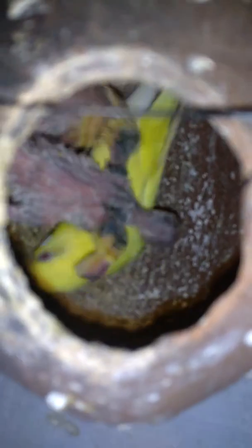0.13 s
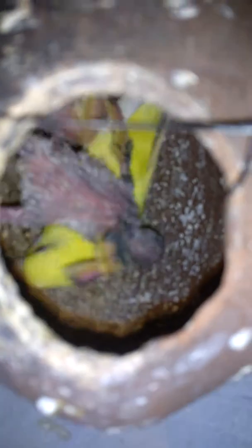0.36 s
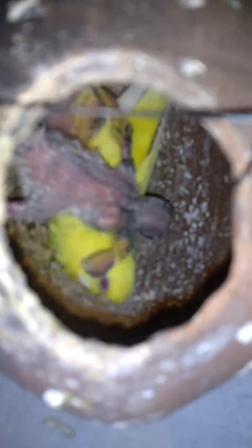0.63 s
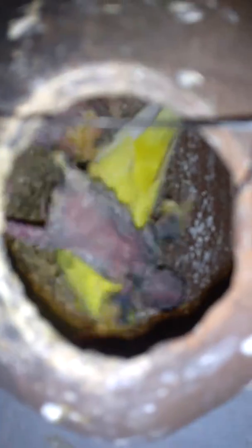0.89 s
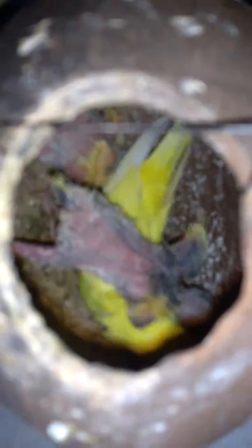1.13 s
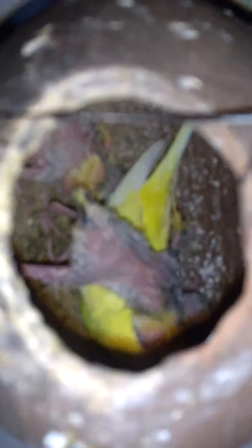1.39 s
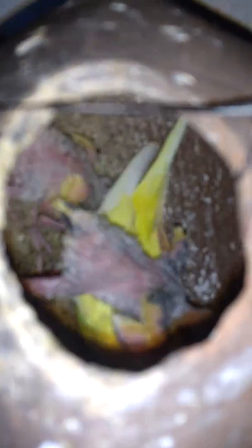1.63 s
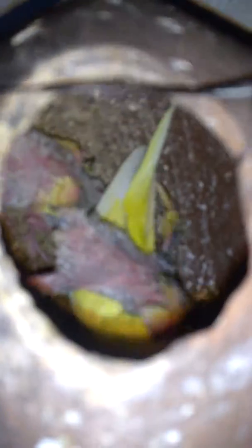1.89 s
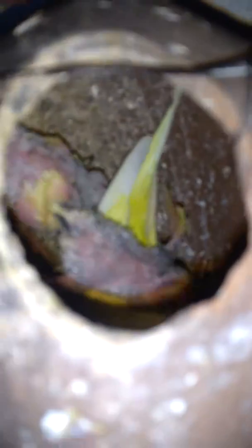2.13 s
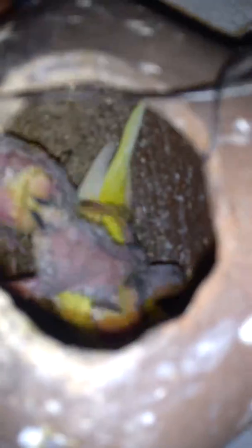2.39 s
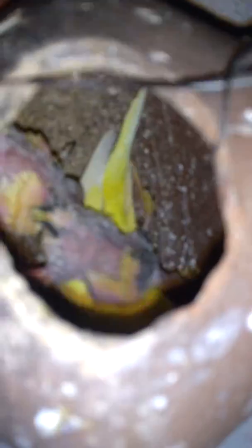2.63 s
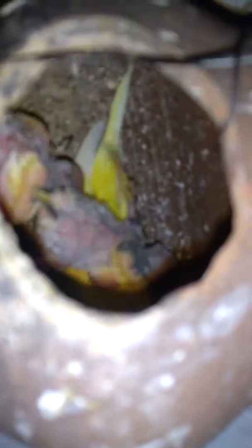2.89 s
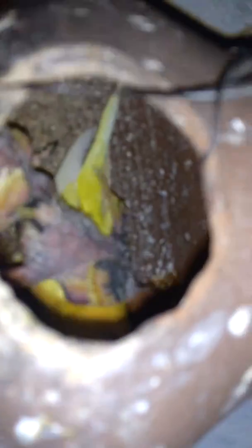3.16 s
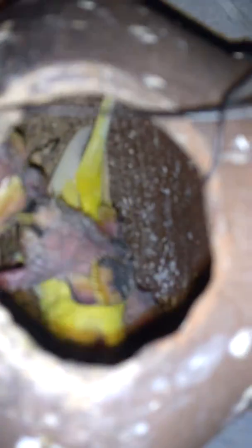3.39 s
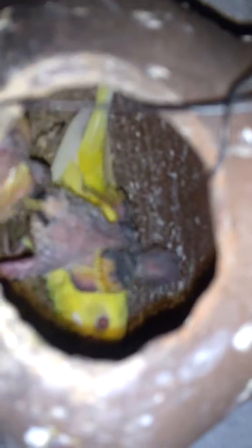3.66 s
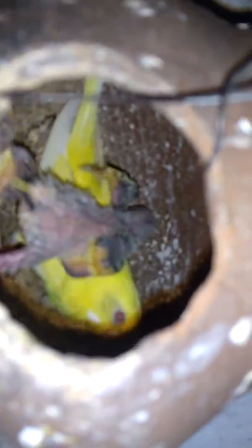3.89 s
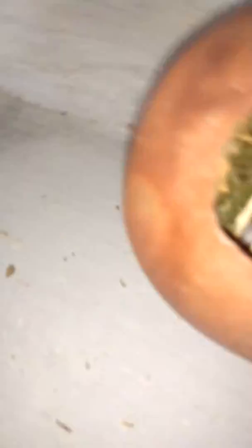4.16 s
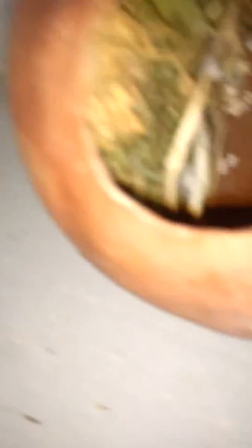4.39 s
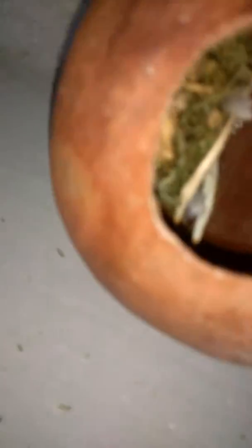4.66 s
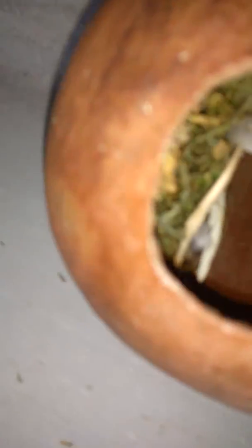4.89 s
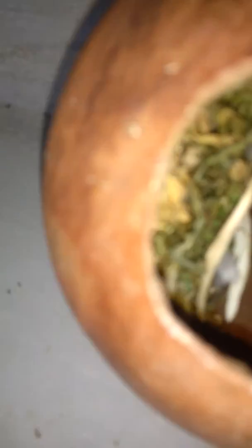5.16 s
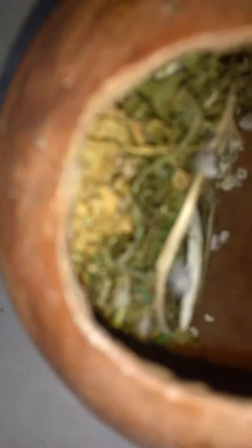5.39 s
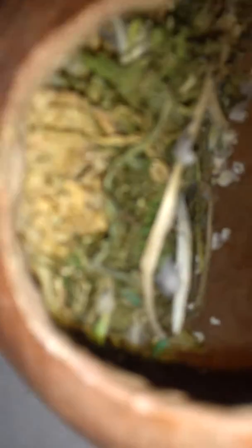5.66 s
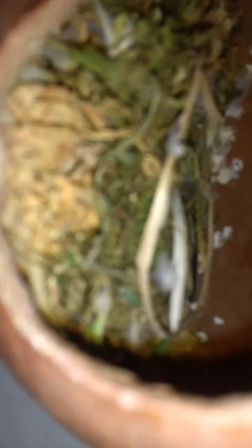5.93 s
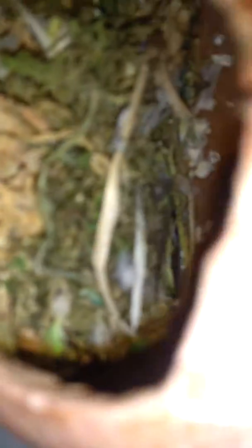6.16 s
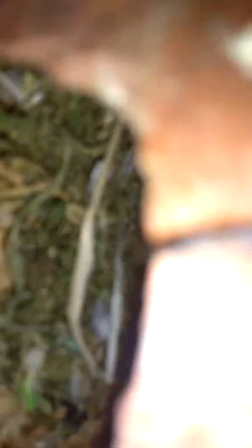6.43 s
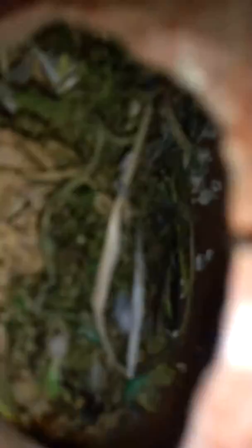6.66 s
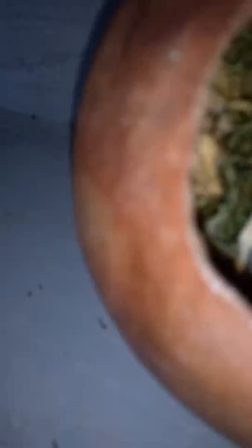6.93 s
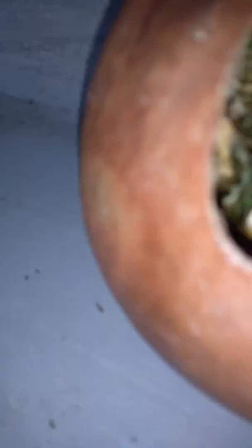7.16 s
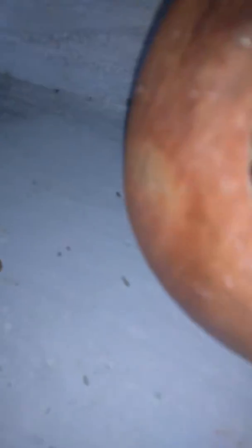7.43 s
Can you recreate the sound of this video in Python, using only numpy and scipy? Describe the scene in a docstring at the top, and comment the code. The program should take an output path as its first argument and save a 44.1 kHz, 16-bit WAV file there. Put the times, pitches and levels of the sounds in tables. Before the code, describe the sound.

Small parakeets chatter densely near a clay nest pot with begging pulses, handling knocks and beak taps, then thinner chirps, a whistle and distant roosters crowing.

```python
"""From the start small parakeets chatter in a walled yard: gliding near sines, swinging tones and begging
pulses over the flock's rasp of noise and wandering tones, with far traffic as coloured noise and a motor's hum.
From 0.9 s a hand knocks the microphone, ringing its casing, and beaks tap a pot; at 3.77 s the birds abruptly
sound farther off and the near echoes stop. At 5.8 s a whistle breaks upward; from 6.8 s three roosters crow as
harmonic stacks. The recorder widens the stereo by subtracting each side, delayed, from the other."""
import sys
import numpy as np
from scipy import signal
from scipy.io import wavfile

SR = 44100
rng = np.random.default_rng(int(sys.argv[2]) if len(sys.argv) > 2 else 0)


def master(y):
    """Save y as 16-bit WAV."""
    cut = np.clip(np.atleast_2d(y).T, -1, 1)
    pcm = np.round(cut * 32767)  # scale
    wavfile.write(sys.argv[1], SR, pcm.astype(np.int16))


def elevation(decibels):
    """Turn decibel levels (scalar or array-like) into linear amplitude ratios."""
    levels = np.asarray(decibels, float)
    return 10 ** (levels / 20)


N = 332955


def rms_one(x):
    """Scale to an rms of 1."""
    return x / np.sqrt(np.mean(x ** 2) + 1e-20)


def butter_filter(x, hz, order, kind):
    """Butterworth filter of the given kind."""
    return signal.sosfilt(signal.butter(order, hz, kind, fs=SR, output="sos"), x)


def phase_of(hz):
    """Running phase in radians of a changing frequency."""
    return 2 * np.pi * np.cumsum(hz) / SR


def in_time(rows):
    """Columns joined by straight lines; negative levels fall silent before the first row."""
    s, *columns = np.transpose(rows)
    t = np.arange(N) / SR
    return [np.interp(t, s, c, left=min(c[0], -150) if c[0] < 0 else c[0]) for c in columns]


def at_hz(points, hz):
    """Read a curve at hz, straight over log frequency."""
    points = np.array(points)
    return np.interp(np.log(hz), np.log(points[:, 0]), points[:, 1])


def drift(rate_hz, shape=N):
    """Slow chance of rms 1: noise through a two-pole low-pass."""
    r = np.exp(-2 * np.pi * rate_hz / SR)
    return rms_one(signal.lfilter([1], [1, -2 * r, r * r], rng.standard_normal(shape)))


def resonance(x, hz, width_hz):
    """Two-pole band-pass."""
    r = np.exp(-np.pi * width_hz / SR)
    poles = [1, -2 * r * np.cos(2 * np.pi * hz / SR), r * r]
    return signal.lfilter([1 - r * r, 0, r * r - 1], poles, x + 1e-18) / 2


def ring(clicks, hz, t60_s):
    """A unit click sets a dying sine of initial height 1 ringing."""
    r, w = elevation(-60 / (t60_s * SR)), 2 * np.pi * hz / SR
    return signal.lfilter([0, np.sin(w)], [1, -2 * r * np.cos(w), r * r], clicks + 1e-18)


def dying(clicks, decay_s):
    """Each click starts an exponential decay."""
    return signal.lfilter([1], [1, -np.exp(-1 / (decay_s * SR))], clicks)


def puffs(per_s=64.0, puff_s=0.012, spread_db=1.5, steady=0.51):
    """Envelope of an uneven buzz: short puffs at random times over a steady part."""
    heights = elevation(spread_db * np.clip(rng.standard_normal(N), -2, 2))
    starts = (rng.random(N) < per_s / SR) * heights
    return steady + rms_one(dying(starts, puff_s))


# Left-right likeness of noise. Each row: frequency in Hz, likeness 0-1.
LIKENESS = [(30, 1), (100, 1), (250, 0.95), (500, 0.066), (1200, 0.031), (2400, 0.025)]


def coloured_noise(spectrum, patchy_db):
    """Third-octave bands of stereo noise, each with its own level, flicker and likeness; rms 1."""
    out, edges_hz = 0, 25 * 2 ** np.arange(0, 7.1, 1 / 3)
    white, flicker = rng.standard_normal((2, 2, N)), drift(14.0)
    for k, (low_hz, high_hz) in enumerate(zip(edges_hz, edges_hz[1:])):
        mid, side = butter_filter(white[k % 2], [low_hz, high_hz], 2, "band")
        hz = np.sqrt(low_hz * high_hz)
        alike = np.clip(at_hz(LIKENESS, hz), 0, 1)
        # the bands share one flicker, shifted in time
        gain = elevation(at_hz(spectrum, hz) + patchy_db * np.roll(flicker, k * N // 23))
        out = out + gain * (np.sqrt(1 + alike) * mid + np.sqrt(1 - alike) * side * [[1], [-1]])
    return rms_one(out)


# Traffic spectrum. Each row: frequency in Hz, relative density in dB per Hz.
TRAFFIC_SPECTRUM = [(15, -47), (25, 23), (49, -11.5), (103, 8.5), (169, 3.5), (262, -7.5), (369, -16),
                    (430, -18), (573, -15), (808, -25.5), (1980, -31.5), (2270, -19), (2400, -50),
                    (3120, -78), (5280, -120)]
# Course of the rumble. Each row: time in seconds, traffic level in dB, motor level in dB.
RUMBLE_LEVEL = sum([ [(0.0, -33, -79), (0.27, -40, -62.5), (0.94, -30.5, -56), (1.28, -44, -64),
                (1.62, -39.5, -60), (1.84, -31.5, -55.5), (2.16, -39.5, -59), (3.68, -32, -55),
                (3.75, -28, -61)], [(3.8, -41, -65), (3.89, -49, -72.5), (4.89, -42.5, -57),
                (5.27, -39, -49.5), (5.65, -35, -46), (5.96, -36, -55), (6.47, -30.5, -48),
                (7.32, -34, -47), (7.55, -26, -48.5)], ], [])
# Hum of a distant motor. Each row: centre in Hz, width in Hz, relative level in dB.
MOTOR_HUM = [(105, 10, 1), (125, 20, 0), (365, 10, 0), (580, 120, -9)]


def rumble():
    """Far traffic as coloured noise, with a motor's hum as resonant noise stronger on the left."""
    traffic_db, motor_db = in_time(RUMBLE_LEVEL)
    hum = sum(elevation(db) * rms_one(resonance(rng.standard_normal(N), hz, width_hz))
              for hz, width_hz, db in MOTOR_HUM)
    traffic = elevation(traffic_db) * coloured_noise(TRAFFIC_SPECTRUM, patchy_db=3.5)
    return traffic + elevation(motor_db) * hum * [[1], [.6]]


def yard(x, t60_s=.24, level_db=-9):
    """Dense echoes off the walls: dying noise, different on each side, from 4 ms on."""
    t = np.arange(round(t60_s * SR)) / SR
    echoes = rng.standard_normal((2, len(t))) * elevation(-60 * t / t60_s) * (t > .004)
    echoes /= np.sqrt(np.sum(echoes ** 2, axis=1, keepdims=True))
    return elevation(level_db) * signal.fftconvolve(x[None], echoes, axes=1)[:, :N]


def throat(hz, width_hz, bursts, fifth_db, roam=.1, breath_db=-3):
    """Six far birds warble around a moving centre with an overtone a fifth above, over breath in that band."""
    birds = []
    for _ in range(6):
        phase = phase_of(hz * (1 + roam * drift(35)))
        tone = np.sin(phase) + elevation(fifth_db) * np.sin(3 * phase / 2)
        birds.append(puffs(40, .009, 4, .05) * tone)
    voices = rms_one(np.array([sum(birds[:4]), sum(birds[2:])]))   # two birds are heard on both sides
    slow = butter_filter(bursts * rng.standard_normal((2, N)), width_hz / 2, 2, "low")
    breath = rms_one(slow * np.cos(phase_of(hz)))   # shifted up to the centre
    return rms_one(voices + elevation(breath_db) * breath)


# Flock levels before panning. Each row: time in seconds, low throat in dB, high throat in dB, sizzle in dB.
RASP = sum([ [(0.0, -28.5, -15, -40), (0.25, -39.5, -90, -44), (0.28, -41, -18, -32), (0.37, -47, -41, -53),
        (0.41, -36, -22, -29), (0.51, -47, -49.5, -63), (0.67, -37, -34, -47.5), (1.01, -54, -75, -55),
        (1.13, -48.5, -39, -55), (1.27, -40.5, -28, -50), (1.52, -40.5, -41.5, -51),
        (1.83, -42, -25.5, -43), (2.21, -35.5, -54, -54.5), (2.26, -36.5, -34, -42.5),
        (2.81, -36, -44, -48), (3.08, -42.5, -27.5, -42.5), (3.25, -39, -48, -50),
        (3.57, -35.5, -61, -44.5), (3.77, -33.5, -36, -41)], [(3.77, -50, -40.5, -54),
        (3.99, -50.5, -74, -68.5), (4.18, -72, -50.5, -66), (4.36, -61, -71, -75), (4.39, -68, -44, -60),
        (4.67, -66.5, -66.5, -65.5), (4.98, -53.5, -43, -55), (5.49, -67, -67, -57), (5.72, -47, -34, -47),
        (5.84, -31, -47, -37), (5.95, -47, -87, -43), (6.03, -60, -57, -60), (6.24, -65, -69, -57.5),
        (6.26, -54.5, -31, -48.5), (6.52, -58, -62, -48.5), (6.64, -45, -65, -60.5),
        (6.92, -64, -37, -47.5), (7.21, -45, -46.5, -50), (7.55, -43.5, -32, -50)], ], [])
# Bands of the sizzle. Each row: centre in Hz, width in Hz, relative level in dB.
SIZZLE = [(9140, 3300, 2), (11520, 1400, -5.5), (14900, 1400, -3.5)]


def rasp():
    """Hoarse flock in two throat bands; sizzle above bursts with the high throat and the begging pulses."""
    low_db, high_db, sizzle_db = in_time(RASP)
    white, bursts, begging = rng.standard_normal((2, N)), puffs(), np.zeros(N)
    begging[[round(s * SR) for s, db, hz in PULSES]] = 1
    begging = dying(begging, 0.0083)
    gated = (bursts + 1.94 * begging + 0.22 * puffs(130, 0.0042, 3.5, 0.059)) * white
    sizzle = sum(elevation(db) * resonance(resonance(gated, hz, width_hz), hz, width_hz)
                 for hz, width_hz, db in SIZZLE)
    low_hz, high_hz = [hz * (1 + .06 * drift(4)) for hz in (3500, 5900)]
    low = elevation(low_db) * throat(low_hz, 4400, puffs(), fifth_db=-1.0)
    high = throat(high_hz, 2150, bursts + 1.7 * begging, fifth_db=-9.5)
    high = elevation(high_db + [[-6.0], [0]]) * high
    return butter_filter(low + high + elevation(sizzle_db) * rms_one(sizzle), 1700, 4, "high")


CROW_FLOOR_HZ = 470   # high-pass of the crowing
# Breath spectrum of the crowing. Each row: frequency in Hz, relative density in dB per Hz.
CROW_BREATH_SPECTRUM = [(260, -59), (450, -47), (576, -8.5), (760, -9.5), (880, -17.5), (1140, -21),
                        (1260, -24), (1400, -16), (1560, -15), (1750, -22.5), (2440, -17.5), (3200, -74),
                        (4160, -45), (7040, -120)]
# Each row: time in seconds, breath level in dB before the high-pass.
CROW_BREATH_LEVEL = [(6.79, -80), (6.82, -42), (6.88, -32), (7.0, -22), (7.2, -36.5), (7.28, -26.5),
                     (7.4, -37.5), (7.55, -24.5)]


def crow_breath():
    """Breath noise of the crowing: coloured noise under a level curve."""
    noise = butter_filter(coloured_noise(CROW_BREATH_SPECTRUM, patchy_db=-3), CROW_FLOOR_HZ, 6, "high")
    return elevation(in_time(CROW_BREATH_LEVEL)[0]) * noise


# One list per rooster. Each row: time in seconds, pitch in Hz, level in dB, second harmonic in dB,
# levels before flutter.
ROOSTERS = [
    [(6.8, 542, -57, -62), (6.83, 548.3, -26, -30.5), (6.89, 559.6, -17, -29.5), (6.97, 581, -17, -30),
     (7.01, 583.7, -11, -32), (7.05, 584, -15, -37), (7.08, 625.2, -20.5, -58), (7.16, 629, -23, -63),
     (7.22, 599.3, -36, -40), (7.26, 567, -18.5, -25), (7.3, 585.3, -11, -35), (7.36, 591, -35, -52),
     (7.43, 612, -44, -60), (7.51, 622.4, -20, -52), (7.55, 665.5, -40, -52)],
    [(6.86, 661.8, -22, -43), (6.92, 694, -29, -31), (7.0, 716.6, -27.5, -32), (7.06, 722.7, -18, -31),
     (7.09, 742.6, -22, -34), (7.17, 735, -22, -34), (7.23, 735.5, -21, -35), (7.29, 742.7, -29, -28.5),
     (7.33, 754.7, -24, -27), (7.42, 751.2, -21, -23), (7.5, 740, -22, -30), (7.55, 715, -30, -38)],
    [(7.06, 767, -44, -40), (7.09, 770, -26, -19), (7.17, 779.6, -41, -26.5), (7.21, 768, -28, -15),
     (7.27, 767.4, -35, -39), (7.38, 775, -28, -28), (7.46, 765, -37, -35), (7.55, 755, -43, -32)],
]


def roosters(third_db=-18.5, fourth_db=-18.0):
    """Each crow is a wavering, fluttering stack of four harmonics."""
    out = 0
    for crow in ROOSTERS:
        hz, first_db, second_db = in_time(crow)
        phase = phase_of(hz * (1 + .007 * drift(70)))
        upper = elevation(third_db) * np.sin(3 * phase) + elevation(fourth_db) * np.sin(4 * phase)
        stack = elevation(first_db) * (np.sin(phase) + upper) + elevation(second_db) * np.sin(2 * phase)
        out = out + stack * elevation(3 * drift(60) + drift(14)) * (1 + .4 * drift(90))
    return butter_filter(out, CROW_FLOOR_HZ, 6, "high")


# Blows on the casing. Each row: time in seconds, strength in dB.
KNOCKS = [(0.8997, -11), (2.448, -16.5), (2.630, -14), (2.822, -23.5), (2.903, -22), (3.585, -15),
          (3.764, -14), (3.7666, 3)]
# Modes of the casing. Each row: frequency in Hz, relative level in dB, 60 dB decay time in seconds.
CASING = [(440, 1.5, .006), (140, 0, .026), (1000, -7, .004)]


def knocks():
    """A blow on the right end of the casing: neighbouring modes start in opposite directions."""
    clicks = np.zeros(N)
    clicks[[round(s * SR) for s, db in KNOCKS]] = elevation(np.array(KNOCKS)[:, 1])
    rings = sum((-1) ** k * elevation(db) * ring(clicks, hz, t60_s) for k, (hz, db, t60_s) in enumerate(CASING))
    return rings * elevation([[-12.0], [0]])


# Beak taps. Each row: time in seconds, level in dB before panning, frequency in Hz.
TAPS = [(1.054, -27, 1100), (1.128, -28.5, 1080), (1.218, -38, 1140), (1.496, -37, 1120)]


def taps(t60_s=0.0095):
    """Beaks tap on a clay nest pot: one short ringing mode per tap."""
    return sum(elevation(db) * ring(np.arange(N) == round(s * SR), hz, t60_s) for s, db, hz in TAPS)


# Toneless calls. Each row: start in seconds, length in seconds, level in dB before shaping, centre in Hz.
SQUAWKS = [(0.269, 0.056, -21.5, 6040), (0.391, 0.07, -24.5, 4630), (1.055, 0.032, -28.5, 3650),
           (1.674, 0.081, -29.5, 4440), (5.262, 0.05, -49.5, 4800), (5.525, 0.2, -38.5, 2730),
           (6.466, 0.032, -32.5, 7500), (2.236, 0.023, -36, 7000)]


def squawks(width_hz=3500, edge_db=-53.0):
    """Broad bursts of resonant noise with a sudden start."""
    out, t = np.zeros(N), np.arange(N) / SR
    white = butter_filter(rng.standard_normal(N), 1500, 2, "high")
    for s, length_s, db, hz in SQUAWKS:
        part = slice(round(s * SR), round((s + length_s) * SR))
        shape = np.interp(t[part] - s, [0, .003, length_s / 2, length_s], [0.18, 0.79, 0.86, 0.074])
        burst = rms_one(resonance(white[part], hz, width_hz)) + elevation(edge_db) * white[part]
        out[part] += elevation(db) * shape * burst
    return out


# Trills. Each row: first low point in seconds, number of dips, period in seconds, low pitch in Hz,
# high pitch in Hz, level in dB before swell and fade, depth of the swell as a factor.
TRILLS = [(.724, 4, .0535, 3620, 4570, -29.5, 0.35), (1.522, 3, 0.062, 3760, 4650, -40, 0.19)]
# One period. Each row: share of the period, height 0-1 from low to high pitch, swell in dB at depth 1.
TRILL_SHAPE = [(0, .05, 1.5), (.17, .9, -7), (.3, .97, -16), (.6, 1, -22), (.82, .95, -7), (1, 0.05, 1.5)]


def trills(lead=.33, fade_db_per_period=1.5):
    """A tone holds a high pitch and dips sharply; it sets in `lead` periods before the first low point."""
    out, t = np.zeros(N), np.arange(N) / SR
    share, height, swell_db = np.transpose(TRILL_SHAPE)
    for s, dips, period_s, low_hz, high_hz, db, depth in TRILLS:
        turn = (t - s) / period_s
        hz = low_hz + (high_hz - low_hz) * np.interp(turn % 1, share, height)
        hz = hz * (1 + .006 * drift(150) + .015 * drift(15))
        on = np.interp(turn, [-lead - .04, -lead, round(dips) - .8, round(dips) - .7], [0, 1, 1, 0])
        level_db = db - fade_db_per_period * np.clip(turn, 0, dips)
        level_db = level_db + depth * np.interp(turn % 1, share, swell_db) + 2 * drift(40)
        out += on * elevation(level_db) * np.sin(phase_of(hz))
    return out


# Phrases that climb slowly and drop fast, loudest at the low end. Each row: time in seconds, pitch in Hz,
# level in dB before flutter.
WARBLES = [
    [(1.2, 3070, -50), (1.21, 3130, -29), (1.22, 3340, -27), (1.238, 3270, -26), (1.25, 4000, -31),
     (1.264, 4450, -34), (1.274, 3384, -22), (1.288, 3500, -36), (1.298, 3290, -48), (1.306, 4180, -35),
     (1.324, 4400, -31), (1.335, 3450, -21.5), (1.354, 3540, -38), (1.368, 4280, -31), (1.382, 4580, -30),
     (1.394, 3660, -26), (1.403, 3970, -27), (1.408, 3400, -30), (1.416, 3250, -29.5), (1.427, 4250, -34),
     (1.443, 4420, -29), (1.454, 3590, -24.5), (1.475, 3540, -54), (1.48, 3580, -97)],
    [(1.952, 2900, -26), (1.966, 3200, -25.5), (1.99, 3420, -24), (2.002, 3800, -35), (2.016, 4150, -25),
     (2.026, 3330, -16), (2.046, 3220, -43), (2.053, 3420, -28), (2.061, 3860, -29), (2.076, 4250, -32),
     (2.088, 3460, -16.5), (2.097, 3415, -19), (2.108, 3350, -34), (2.122, 3710, -37), (2.138, 4200, -41),
     (2.148, 3545, -23.5), (2.168, 3430, -39), (2.18, 3820, -47), (2.19, 3800, -45), (2.2, 3560, -36),
     (2.21, 3000, -59), (2.215, 2900, -85)],
    [(3.556, 4300, -51), (3.567, 3290, -23), (3.58, 3500, -36), (3.6, 4000, -54), (3.615, 4300, -37),
     (3.627, 3500, -38), (3.636, 3420, -15), (3.65, 3450, -54), (3.668, 4000, -37), (3.68, 4300, -46),
     (3.69, 3500, -27), (3.705, 3500, -49), (3.72, 4200, -42), (3.73, 4480, -20), (3.74, 4080, -46),
     (3.748, 3470, -24.5), (3.756, 3500, -30), (3.765, 3280, -38), (3.767, 3250, -81)],
]


def warbles():
    """One nearly clean, slightly wavering tone for each phrase."""
    out = 0
    for phrase in WARBLES:
        hz, db = in_time(phrase)
        out = out + elevation(db + 1.5 * drift(80)) * np.sin(phase_of(hz * (1 + .006 * drift(150))))
    return out


# A rising whistle that breaks upward. Each row: time in seconds, pitch in Hz, level in dB,
# second harmonic in dB, fourth harmonic in dB, levels before flutter.
WHISTLE = [(5.79, 1649, -36, -39, -80), (5.825, 1900, -27, -35, -70), (5.85, 2240, -12.5, -27, -70),
           (5.872, 2222, -18, -26, -68), (5.88, 2870, -17, -31, -57), (5.9, 3023, -14.5, -41, -46),
           (5.95, 3089, -19, -40, -42), (5.975, 3044, -21, -53, -45), (6.008, 3028, -25.5, -66, -75),
           (6.1, 2990, -36.5, -75, -88), (6.22, 3005, -57, -90, -99), (6.23, 2940, -90, -99, -99)]


def whistle(third_db=-20.0):
    """A rough fluttering tone with three overtones; third_db is relative to the second harmonic."""
    hz, db, second_db, fourth_db = in_time(WHISTLE)
    phase = phase_of(hz * (1 + .014 * drift(250)))
    upper = elevation(second_db) * (np.sin(2 * phase) + elevation(third_db) * np.sin(3 * phase))
    upper = upper + elevation(fourth_db) * np.sin(4 * phase)
    return elevation(2.6 * drift(115)) * (elevation(db) * np.sin(phase) + upper)


PULSE_S = .007
# Single glides. Each row: start in seconds, length in seconds, start pitch in Hz, end pitch in Hz,
# level in dB before shaping.
NOTES = [(0, 0.034, 3270, 3500, -27), (0.022, 0.068, 3546, 2680, -26), (0.07, 0.06, 2860, 2105, -24),
         (0.043, 0.32, 5420, 5130, -29.5), (0.186, 0.1, 2400, 2460, -28.5),
         (0.811, 0.098, 5500, 5030, -31.5), (0.941, 0.2, 5190, 5140, -38.5),
         (1.055, 0.03, 4000, 4610, -24.5), (1.13, 0.025, 4700, 3930, -24), (1.133, 0.014, 2626, 2750, -31),
         (0, 0.17, 1110, 1134, -49), (0.682, 0.13, 1138, 1146, -51), (0.92, 0.011, 5820, 5900, -31),
         (0.521, 0.017, 3500, 3570, -36.5), (1.133, 0.032, 5240, 5625, -16), (1.493, 0.08, 4980, 4950, -33),
         (1.567, 0.069, 2870, 2340, -32.5), (1.705, 0.063, 3190, 3317, -27.5),
         (1.847, 0.015, 3960, 3900, -33), (1.901, 0.0093, 3770, 3700, -29.5),
         (2.228, 0.076, 5240, 5250, -48), (2.236, 0.023, 5350, 4930, -14), (2.242, 0.024, 4840, 3160, -27),
         (2.197, 0.028, 5900, 5300, -41), (2.274, 0.029, 3935, 3500, -18.5),
         (2.263, 0.11, 3190, 3210, -24.5), (2.29, 0.059, 3450, 2854, -22), (2.5, 0.014, 3990, 3270, -18.5),
         (2.515, 0.031, 2920, 2823, -17), (2.545, 0.062, 2345, 2233, -26.5),
         (2.569, 0.013, 4740, 4800, -21), (2.75, 0.028, 4060, 3430, -30), (2.76, 0.052, 6740, 6330, -40),
         (2.822, 0.033, 4890, 3080, -30), (2.836, 0.048, 3060, 2740, -26.5),
         (2.874, 0.044, 3870, 3926, -26.5), (2.875, 0.025, 3620, 3150, -25), (2.904, 0.06, 2576, 2297, -20),
         (2.94, 0.011, 1810, 1700, -26), (3.159, 0.078, 5100, 4380, -28), (3.278, 0.031, 4880, 4530, -21.5),
         (3.304, 0.03, 4180, 3530, -25), (3.343, 0.018, 4270, 4110, -24), (3.369, 0.039, 3640, 3190, -28.5),
         (3.379, 0.054, 2917, 2800, -24), (3.406, 0.07, 2333, 2032, -24.5), (3.414, 0.083, 2960, 2830, -35),
         (3.495, 0.035, 3050, 2970, -31.5), (3.558, 0.052, 3040, 2875, -28),
         (3.67, 0.016, 4720, 4610, -21.5), (3.878, 0.034, 3500, 3600, -41), (3.885, 0.035, 4220, 4400, -38),
         (3.886, 0.06, 2050, 2250, -39), (3.91, 0.022, 3550, 3320, -32.5),
         (3.928, 0.065, 3000, 2894, -39.5), (3.952, 0.064, 3600, 3400, -63),
         (4.117, 0.017, 4230, 3500, -41), (4.13, 0.021, 2990, 2740, -38), (4.134, 0.035, 5500, 4900, -39.5),
         (4.142, 0.019, 3900, 3650, -37), (4.16, 0.024, 4160, 3350, -32), (4.179, 0.046, 2886, 2605, -32.5),
         (4.235, 0.03, 2150, 2100, -44), (4.255, 0.036, 1800, 1610, -54), (4.28, 0.029, 1400, 1350, -54),
         (4.312, 0.057, 1605, 1780, -56), (4.377, 0.017, 3350, 3300, -49),
         (4.459, 0.095, 2760, 2785, -46.5), (4.704, 0.0216, 3980, 3500, -42.5),
         (4.725, 0.018, 3710, 3260, -40), (4.742, 0.03, 4070, 3520, -50), (4.734, 0.072, 2640, 2150, -39),
         (4.78, 0.048, 3780, 2550, -37), (4.824, 0.067, 2690, 3284, -35.5), (4.84, 0.11, 2014, 1895, -43.5),
         (4.974, 0.07, 2940, 2600, -44.5), (5.133, 0.029, 2940, 3150, -38), (1.18, 0.035, 3410, 3500, -34),
         (2.44, 0.014, 4180, 3960, -24.5), (2.683, 0.013, 3080, 3380, -49),
         (3.119, 0.34, 2640, 2620, -35.5), (1.263, 0.3, 2810, 2707, -39), (5.13, 0.063, 5700, 5920, -43),
         (5.433, 0.0346, 5490, 5970, -37.5), (5.538, 0.024, 3800, 3500, -28),
         (5.551, 0.011, 2950, 3500, -28), (5.57, 0.078, 3990, 3630, -41), (5.54, 0.098, 2476, 2115, -31.5),
         (5.607, 0.073, 3000, 2740, -29.5), (5.636, 0.025, 5440, 5640, -23.5),
         (5.654, 0.081, 2225, 1960, -32), (5.669, 0.05, 3124, 3065, -30),
         (5.721, 0.0075, 4840, 5900, -16.5), (5.809, 0.021, 5460, 5830, -30),
         (5.865, 0.04, 2340, 2660, -13), (5.919, 0.076, 2383, 2480, -22), (5.531, 0.059, 5450, 6050, -45),
         (6.305, 0.04, 4770, 4654, -26.5), (6.36, 0.062, 4940, 4660, -35),
         (6.477, 0.018, 6500, 6000, -32.5), (6.713, .03, 3950, 4900, -34.5),
         (6.465, 0.034, 4737, 4660, -16), (6.485, 0.022, 4470, 3235, -22.5),
         (6.494, 0.053, 3525, 3363, -14), (6.504, 0.052, 3006, 2940, -19),
         (6.545, 0.039, 3114, 3290, -25.5), (6.557, 0.053, 2553, 2403, -18),
         (6.676, 0.015, 3430, 3180, -32.5), (6.668, 0.067, 6630, 6020, -38.5),
         (6.704, 0.086, 5930, 5340, -37.5), (4.236, 0.14, 5900, 5030, -57.5),
         (4.867, 0.065, 7000, 5900, -63), (6.75, 0.039, 1967, 1863, -31.5), (6.939, 0.018, 4900, 4880, -21),
         (6.963, 0.033, 4250, 4630, -29), (7.005, 0.012, 5080, 5000, -21.5),
         (7.26, 0.013, 4824, 3500, -19.5), (7.271, 0.021, 3120, 3230, -25), (7.328, 0.017, 3400, 3500, -16),
         (7.336, 0.034, 3310, 2865, -14), (7.287, 0.0094, 3500, 3470, -24),
         (7.049, 0.034, 4030, 4230, -33.5)]
# Begging calls, trains of short high pulses. Each row: start in seconds, level in dB before pulse_db,
# middle pitch in Hz.
PULSES = [(0.0149, -16, 6300), (0.0548, -13, 6360), (0.0822, -20, 5870), (0.1096, -11, 6250),
          (0.1261, -17, 6170), (0.1466, -29, 5550), (0.1675, -18, 6260), (0.188, -18, 6020),
          (0.2209, -19, 6300), (0.2409, -13, 6330), (0.2718, -13, 5900), (0.5723, -34, 6200),
          (0.5853, -17.5, 6330), (0.6097, -20.5, 6280), (0.6466, -18.5, 6200), (0.6791, -41, 6200),
          (0.697, -17, 6240), (0.718, -22, 6240), (0.7594, -16.5, 5650), (0.7848, -21, 6200),
          (0.8207, -16, 5650), (0.8522, -21, 6000), (0.8696, -26, 5700), (1.1903, -16, 6250),
          (1.2162, -13, 6500), (1.2417, -13, 5670), (1.309, -35, 5800), (1.324, -25, 6300),
          (1.3769, -22, 5800), (1.3948, -19, 5450), (1.4143, -19, 5900), (1.4766, -36, 5700),
          (1.6794, -11.5, 5200), (1.7013, -20, 6420), (1.7148, -10, 6510), (1.7327, -13, 6320),
          (1.7806, -14.5, 6400), (1.7966, -25, 6140), (1.8071, -24, 5970), (1.83, -16, 5700),
          (1.853, -14, 5770), (1.8759, -15, 5300), (1.9243, -10.5, 5270), (1.9383, -14.5, 5660),
          (1.9896, -9.5, 5580), (2.0066, -19, 5800), (2.046, -19.5, 5200), (2.064, -15, 5280),
          (2.0869, -22, 6050), (2.1164, -34, 6350), (2.1473, -21, 5600), (2.1613, -24.5, 5900),
          (2.2141, -35, 5460), (2.2663, -28, 6400), (2.3192, -39, 5900), (2.3511, -13.5, 6070),
          (2.3691, -9, 6600), (2.391, -13, 6170), (2.419, -10.5, 5900), (2.4344, -13, 6150),
          (2.4993, -24, 6150), (2.5422, -25, 5370), (2.5577, -15, 5900), (2.623, -18, 5530),
          (2.6569, -18, 6000), (2.9813, -16, 5150), (2.9823, -8, 6170), (3.0062, -30, 6450),
          (3.0387, -14, 6200), (3.0656, -12, 6200), (3.0841, -15, 5430), (3.1025, -15, 5720),
          (3.1499, -24, 5830), (3.1644, -18.5, 5500), (3.2003, -18, 5600), (3.2168, -19, 5400),
          (3.2417, -17, 5320), (3.2597, -23, 5700), (3.2771, -19, 5200), (3.3848, -26.5, 6650),
          (3.4302, -40, 5900), (3.4442, -28, 6600), (3.4791, -36, 5700), (3.504, -24, 6270),
          (3.5235, -29, 6100), (3.5684, -46, 6000), (3.6018, -33, 5900), (3.6233, -5.5, 6600),
          (3.6432, -11, 5900), (3.6607, -13, 6280), (3.6761, -19, 6720), (3.7101, -14, 5470),
          (3.7265, -13, 6150), (4.3604, -52, 5600), (4.3773, -36, 6250), (4.3898, -39, 6100),
          (4.4003, -26.5, 5440), (4.4247, -26, 5650), (4.4382, -41, 6130), (4.4591, -28, 5600),
          (4.4876, -32, 5700), (0.0324, -16, 6250), (0.6254, -30, 6220), (0.6614, -15, 5340),
          (0.7964, -26, 5800), (1.2024, -21, 6300), (1.2284, -18, 5870), (1.2534, -17, 6170),
          (1.8874, -15, 5500), (2.4074, -10.5, 6210), (3.0504, -28, 6340), (3.1164, -19, 5370),
          (3.6874, -22, 6270), (4.9848, -22, 6230), (5.0053, -21.5, 5950), (5.0317, -26, 6220),
          (5.102, -27.5, 5360), (6.2369, -53, 5740), (6.2623, -21, 5920), (6.2853, -18.5, 5760),
          (6.3157, -22, 6300), (6.3336, -19, 5500), (6.3571, -19, 5380), (6.385, -28, 5500),
          (6.8894, -37, 5300), (6.9168, -18.5, 5840), (7.0211, -38, 6000), (7.3328, -36, 7000),
          (7.3403, -46, 6250), (7.3578, -23, 5170), (7.3877, -35, 6200), (7.4017, -24.5, 6310),
          (7.4391, -32, 5600), (7.474, -27, 5600), (7.492, -17.5, 5716), (7.5239, -18, 5510)]


def notes(pulse_db=-5.5, pulse_drop_hz=350, halfway_share=.75, copy_late_s=.018, copy_detune=.04,
          copy_db=-11):
    """Rows (s, length s, three pitches Hz, dB): glides, each with a fainter, detuned late copy; falling pulses."""
    rows = []
    tunes = 1 + copy_detune * rng.standard_normal((len(NOTES), 3))
    for (s, length_s, start_hz, end_hz, db), tune in zip(NOTES, tunes):
        # halfway_share of the glide is done at half its length
        pitches = np.array([start_hz, start_hz + halfway_share * (end_hz - start_hz), end_hz])
        rows.append((s, length_s, *pitches, db))
        rows.append((s + copy_late_s, length_s, *(pitches * tune), db + copy_db))
    half_hz = pulse_drop_hz / 2
    return rows + [(s, PULSE_S, hz + half_hz, hz, hz - half_hz, db + pulse_db) for s, db, hz in PULSES]


def chirps(octave_db=-24.0, fifth_db=-15.5, under_db=-12.0, far_side_db=-38.0, break_hz=4700):
    """Near sines glide through three pitches, wavering and fluttering, each in a halo of breath."""
    out = np.zeros((2, N))
    wobble = 1 + .01 * drift(250) + .012 * drift(50)
    flutter = elevation(2.0 * drift(150) + 2.5 * drift(45) - 1)
    breath = rms_one(butter_filter(rng.standard_normal((2, N)), 500, 4, "low"))
    clear, hoarse = [elevation([[0], [far_side_db]]) + elevation(db) * breath for db in (-10, -8)]
    white = resonance(rng.standard_normal((2, N)), 3700, 4500)
    throb = np.cos(phase_of(57 * (1 + .12 * drift(12))) / 2) ** 2   # about 57 Hz
    for s, length_s, start_hz, middle_hz, end_hz, db in notes():
        part = np.arange(round(s * SR), min(N, round((s + length_s) * SR)))
        share, high = np.linspace(0, 1, len(part)), middle_hz > break_hz
        hz = np.interp(share, [0, .5, 1], [start_hz, middle_hz, end_hz]) * wobble[part]
        phase = phase_of(hz)
        tone = np.sin(phase) + elevation(octave_db) * np.sin(2 * phase)
        if high:   # a second harmonic: the first lies an octave below, the third a fifth above
            tone = tone + elevation(fifth_db) * np.sin(3 * phase / 2) + elevation(under_db) * np.sin(phase / 2)
        shape = np.sin(np.pi / 2 * np.interp(share, [0, .08, .7, 1], [0, 1, .85, 0]))
        rough = high and length_s > .035   # long high notes are hoarse and throb
        if rough:
            shape = shape * (1.26 + throb[part])
        # high notes start with a scratchy tick, strongest in pulses
        tick_db = -10 if length_s <= PULSE_S else -18
        tick = high * elevation(tick_db) * np.exp(-share * length_s / .002) * white[:, part]
        halo = (hoarse if rough else clear)[:, part]
        if high:   # from the right; low notes from the left
            halo = halo[::-1]
        out[:, part] += elevation(db) * (shape * tone * halo + tick)
    return out * flutter


def scene(jump_s=3.767):
    """Panned sources, their yard echoes and the background; at jump_s the near echoes stop."""
    song = chirps() + (warbles() + trills() + whistle()) * elevation([[0], [-10.0]])
    calls, crowing = squawks() + taps(), roosters()
    direct = song + calls * elevation([[0], [-8.0]]) + crowing * elevation([[0], [-24]])
    sent = song.sum(axis=0) + calls + elevation(6.0) * crowing
    near = np.arange(N) < jump_s * SR
    echoes = near * yard(sent) + yard(sent * ~near)
    flock = rasp() * elevation([[1.5], [-1.5]])
    return direct + echoes + flock + crow_breath() + rumble() + knocks()


def band_limit(x):
    """A steep low-pass at the top of the band."""
    return signal.sosfilt(signal.butter(12, 16370, fs=SR, output="sos"), x)


def record(dry, cross_lag_s=.00039, cross_gain=.92, cross_cut_hz=5000, right_over_left_db=1.0):
    """Each side loses a delayed, dulled copy of the other; the right is hotter; the loudest knock overloads."""
    n, r = np.arange(N), np.exp(-2 * np.pi * cross_cut_hz / SR)
    late = np.array([np.interp(n - cross_lag_s * SR, n, side) for side in dry[::-1]])
    wide = dry - cross_gain * signal.lfilter([1 - r], [1, -r], late)
    wide = wide * elevation([[-right_over_left_db / 2], [right_over_left_db / 2]])
    wide = butter_filter(wide, 40, 4, "high")   # small microphones lose the deepest bass
    wide = signal.sosfilt(signal.cheby2(12, 60, 16000, fs=SR, output="sos"), wide)   # steep low-pass
    mix = np.clip(wide, -1, 1)
    return band_limit(mix)


dry = scene()
out = record(dry)
master(out)
```